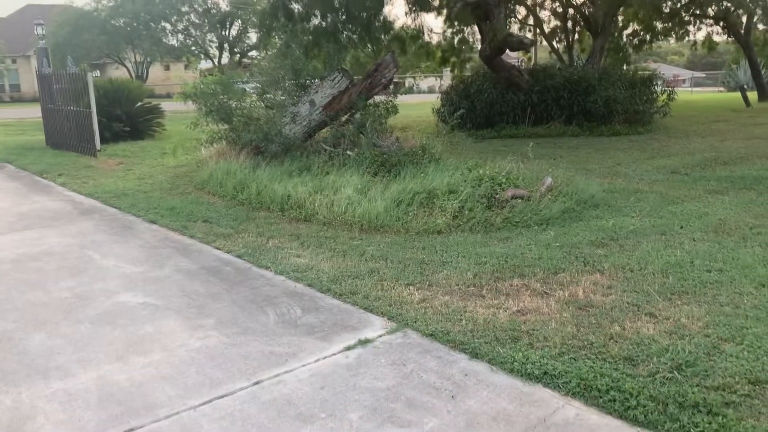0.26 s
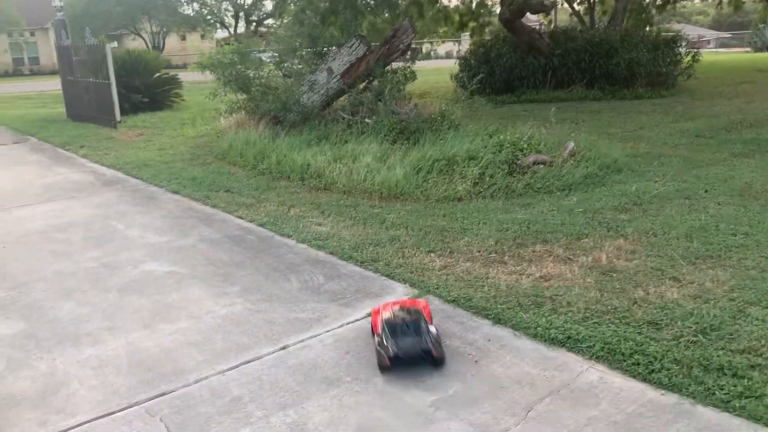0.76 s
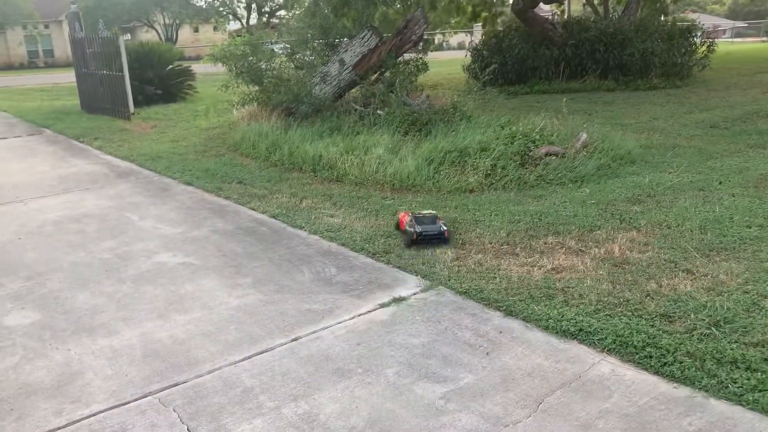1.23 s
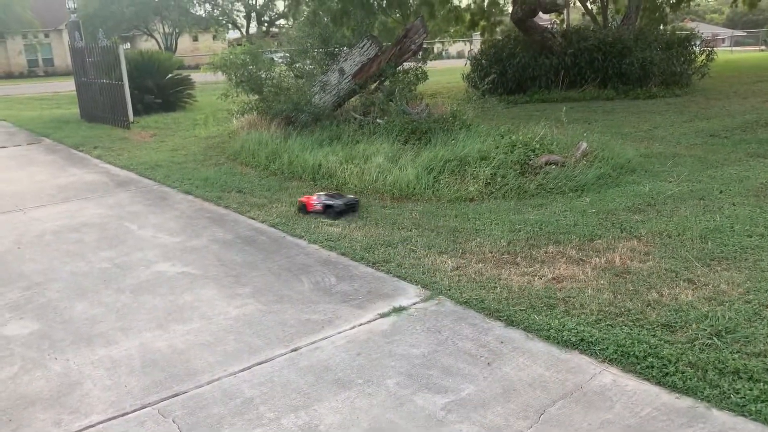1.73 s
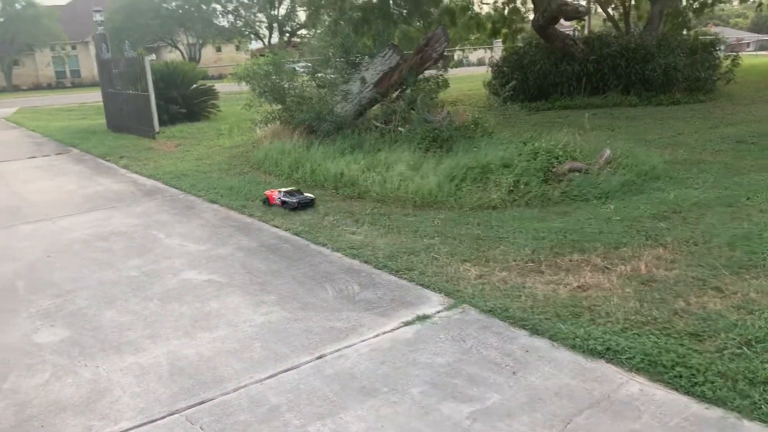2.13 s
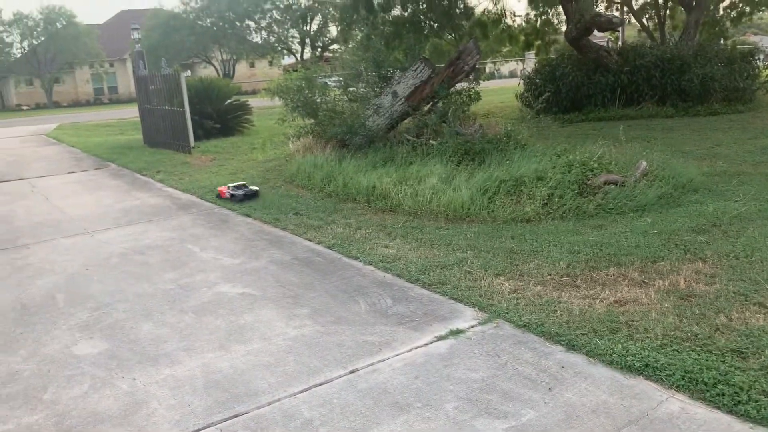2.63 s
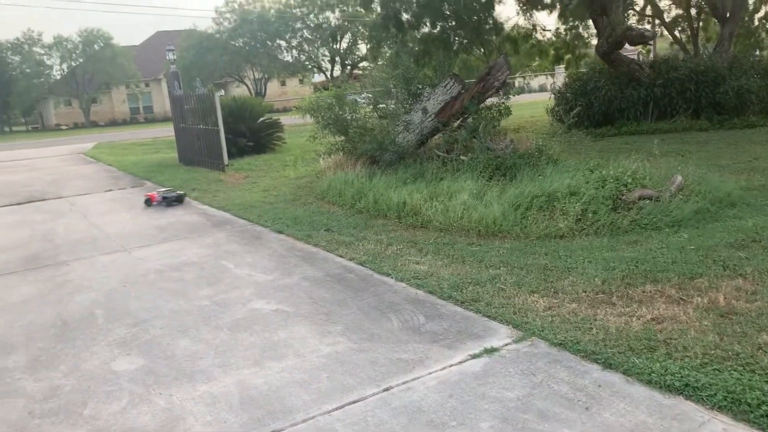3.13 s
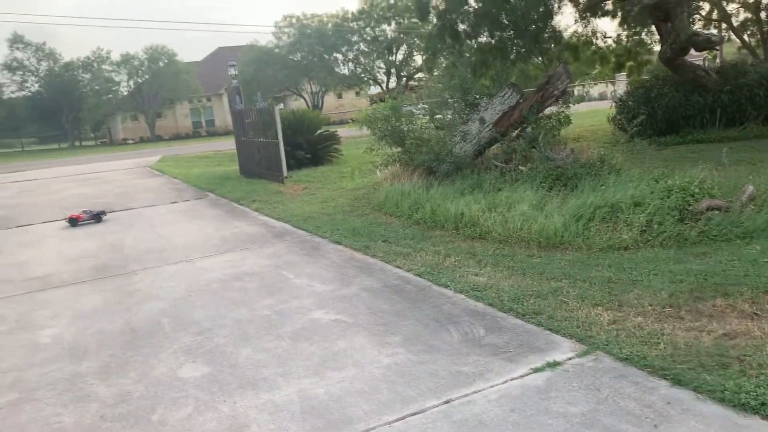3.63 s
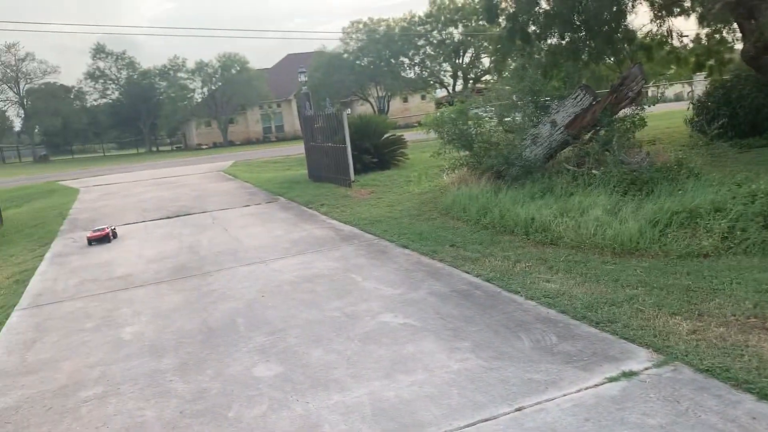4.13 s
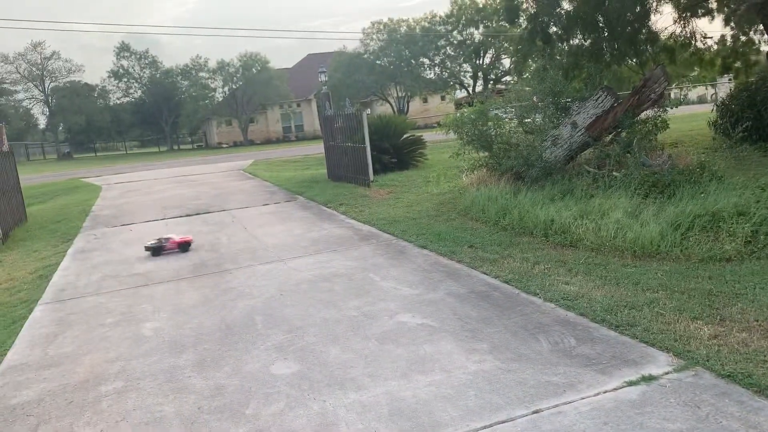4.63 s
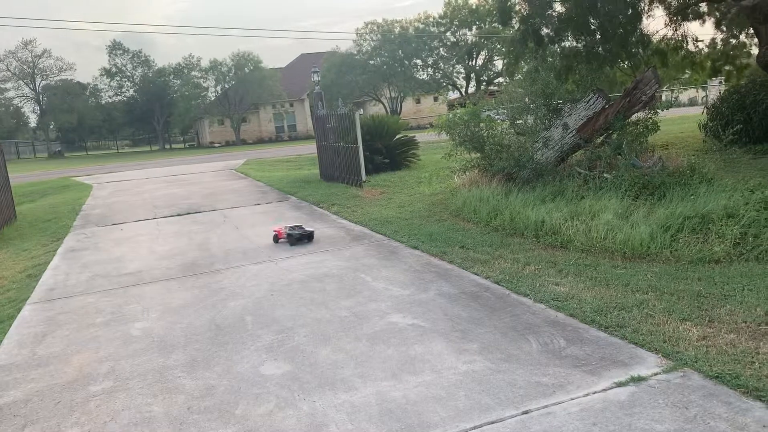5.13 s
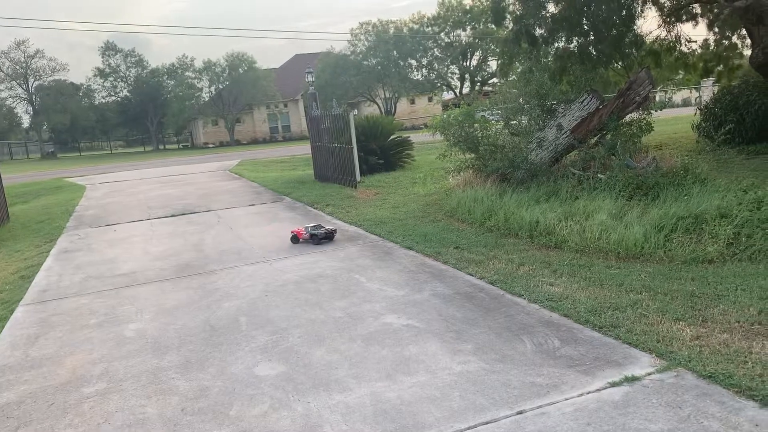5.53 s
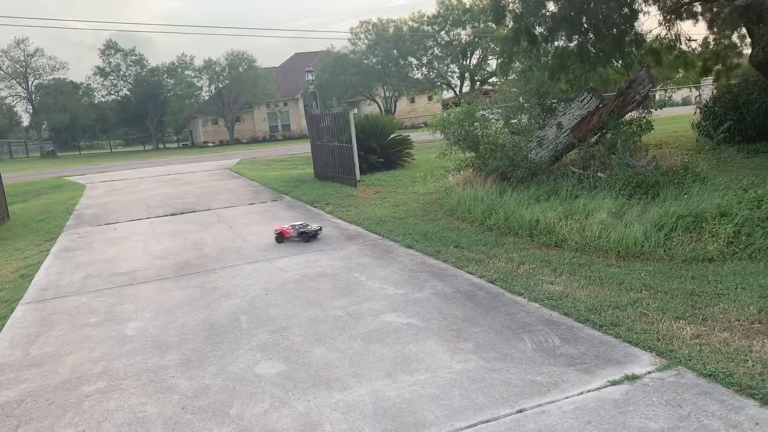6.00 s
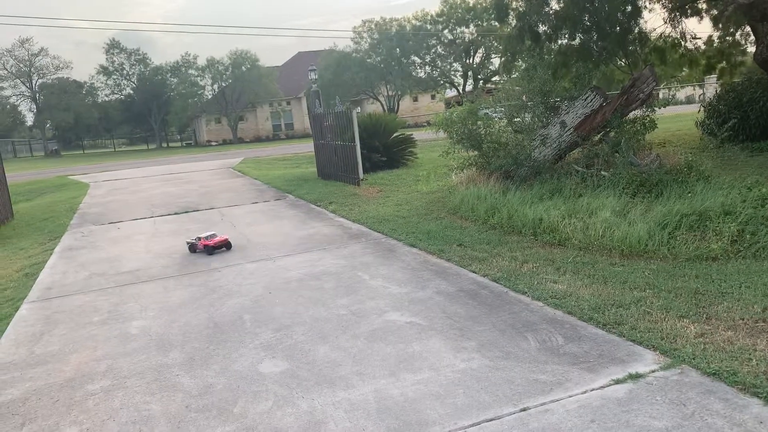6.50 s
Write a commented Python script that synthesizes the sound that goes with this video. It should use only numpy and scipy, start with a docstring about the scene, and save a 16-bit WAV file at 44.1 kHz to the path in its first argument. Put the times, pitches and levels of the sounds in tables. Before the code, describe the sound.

Outdoors, over light wind rumble and a faint, very high pulsing insect chorus, a small radio-controlled truck revs a few metres away. In the first half second its gears whine, tyres skid and chirp, and the body drums and thuds. It passes about a metre away at 0.5-0.8 s, loudest and closest, with a faint high motor tone. From 1 to 2.8 s it crosses grass: tyre howl drops, loose plastic rattles, bumps thud and the teeth chatter. Around 3 s it returns to concrete about seven metres off, with a strong hollow skid, squeals and gear clashes near 3.4 and 3.9 s. A long rev climbs from 4.2 s, then brakes at 5 s with overlapping squeals. A near lull follows until 5.8 s, when another high rev and slide begin, ending with braking and short squeals after 6.5 s.

```python
"""A house driveway and lawn, two microphones: a small radio-controlled truck darts off the concrete,
loops over the grass and comes back in bursts of throttle, about 1 to 7 m away.
Its gears whine, summed from mesh harmonics that flutter once per turn of the spur gear; the knobbly tyres
howl by replaying their tread and squeal as gliding tones; grit and loose parts are dense clicks; bumps thud.
Behind it insects pulse in the trees as gated noise, and light wind buffets the microphones as low noise."""
import sys
import numpy as np
from scipy import signal
from scipy.fft import rfft, irfft, next_fast_len
from scipy.io import wavfile
from scipy.ndimage import uniform_filter1d, map_coordinates

SR = 44100
rng = np.random.default_rng(int(sys.argv[2]) if len(sys.argv) > 2 else 0)


def materialize(psi):
    """Save the field psi as 16-bit PCM at rate SR to the path in sys.argv[1].

    A 1-D psi becomes a single channel; in a 2-D psi each row is a channel.
    """
    bounded = np.clip(np.atleast_2d(psi).T, -1, 1)
    quanta = np.round(bounded * 32767).astype(np.int16)
    wavfile.write(sys.argv[1], SR, quanta)


N = 298116
TIME = np.arange(N) / SR
CUTOFF_HZ = 16000   # top of the recorded band
# tooth-mesh rates: on arrival, at a crawl, all but stopped, and the speed at which rolling levels are stated
ENTRY_HZ, CRAWL_HZ, STALL_HZ, CRUISE_HZ = 4225, 1605, 704, 4000


def from_db(db):
    """Decibels to gain."""
    return 10 ** (np.asarray(db) / 20)


def rms_one(x):
    """Scale to unit power."""
    return x / np.sqrt(np.mean(x ** 2) + 1e-20)


def in_time(rows):
    """Each column of a table as a curve over all samples; the first column is time."""
    s, *columns = np.transpose(rows)
    return [np.interp(TIME, s, c) for c in columns]


def colour(x, spectrum):
    """Give a signal a spectrum that falls away beyond its end points; unit power."""
    hz, db = np.transpose(spectrum)
    size = next_fast_len(N)
    f = np.maximum(np.arange(size // 2 + 1) * SR / size, 1)
    edges = np.minimum(1, np.minimum(f / hz[0], hz[-1] / f)) ** 2
    gain = from_db(np.interp(np.log(f), np.log(hz), db)) * edges
    return rms_one(irfft(rfft(x, size) * gain, size)[..., :N])


def drift(rate):
    """Smooth random curve of spread 1 that changes about rate times a second."""
    size = next_fast_len(N)
    f = np.arange(size // 2 + 1) * SR / size
    smooth = rfft(rng.standard_normal(size)) / (1 + (f / rate) ** 4)
    return rms_one(irfft(smooth, size)[:N])


def grains(per_s, spread_db):
    """Random clicks of uneven size and either sign; unit power."""
    unevenness = np.minimum(rng.exponential(1, N), 4)
    sizes = from_db(spread_db * unevenness) * rng.choice([-1, 1], N)
    return rms_one(sizes * (rng.random(N) < per_s / SR))


# wind at the microphones over time: time_s, level_db
WIND_LEVEL = [(0, -35.5), (.3, -36.5), (.7, -30.5), (1.05, -37), (1.2, -32.5), (1.7, -35), (2.35, -36.5),
              (2.55, -42), (2.8, -36.5), (3.4, -36.5), (4.0, -36.5), (4.8, -37.5), (5.1, -31.5),
              (5.4, -38.5), (6.76, -37)]
# spectrum of the buffeting: frequency_hz, level_db
WIND_SPECTRUM = [(20, -4.5), (40, 1.5), (70, -1.5), (120, -7), (200, -13.5), (320, -21.5), (600, -89)]


def wind(lumpy_db=2.5, apart=0.31):
    """Lumpy low buffeting at the microphones, partly different on each side."""
    level_db, = in_time(WIND_LEVEL)
    common, own = colour(rng.standard_normal((2, N)), WIND_SPECTRUM)
    both_sides = common + apart * own * np.array([[1], [-1]])
    return from_db(level_db) * rms_one(from_db(lumpy_db * drift(4.0))) * both_sides


# spectrum of the far background: frequency_hz, level_db
AIR_SPECTRUM = [(100, -4), (350, -6), (600, -7), (1200, -8.5), (2600, -0.5), (4000, -24), (6000, -23),
                (9000, -30.5)]


def far_air(level_db=-50):
    """Steady soft noise with a broad spectrum, behind everything else."""
    return from_db(level_db) * colour(rng.standard_normal(N), AIR_SPECTRUM)


# insect chorus in the trees over time: time_s, level_db
INSECT_LEVEL = [(0, -39.5), (0.5, -44), (1.2, -41.5), (1.8, -44), (3.3, -41.5), (4.15, -46), (4.6, -41),
                (5.5, -42.5), (6.35, -34), (6.76, -39)]
# spectrum of the song: frequency_hz, level_db
INSECT_SPECTRUM = [(8000, -45), (10500, -46), (12300, -3.5), (13500, -9.5), (14700, 7), (16000, -3.5)]


def insects(pulse_hz=29, pulse_db=2.0, tooth_hz=235, rasp_db=1.0):
    """Wing strokes pulse a shrill band; the file's teeth rasp inside each stroke."""
    level_db, = in_time(INSECT_LEVEL)
    stroke = np.sin(2 * np.pi * np.cumsum(pulse_hz * (1 + 0.178 * drift(1.47))) / SR)
    teeth = np.sin(2 * np.pi * np.cumsum(tooth_hz * (1 + 0.05 * drift(28.8))) / SR)
    song = colour(rng.standard_normal(N), INSECT_SPECTRUM) * from_db(pulse_db * stroke + rasp_db * teeth)
    return from_db(level_db) * rms_one(song)


def place(x, left_lead_ms):
    """A sound from one side reaches the two microphones at different times."""
    shift = left_lead_ms / 1000 * SR / 2   # samples, half on each side
    return np.array([map_coordinates(x, [np.arange(N) + side * shift], order=3, mode="nearest")
                     for side in (1, -1)])


def garden(x, t60=0.22, wet_db=-18):
    """Walls and trees scatter a faint tail of the higher sounds, different on each side."""
    t = TIME[:SR // 2]
    tail = rng.standard_normal((2, len(t))) * from_db(-60 * t / t60) * (t > .012)
    band = signal.butter(2, [1500, 9000], "band", fs=SR, output="sos")
    tail = signal.sosfilt(band, tail)
    tail /= np.sqrt(np.sum(tail ** 2, axis=1, keepdims=True))
    return from_db(wet_db) * signal.fftconvolve(x[None], tail, axes=1)[:, :N]


# the truck lands on bumps, as heard at the microphones, before the mode levels below:
# time_s, level_db, hardness_db_per_octave
BUMPS = [(0.095, -27, -8), (0.354, -21, -2), (0.937, -23, -10), (1.159, -24, -8), (1.219, -39, -1),
         (1.311, -29.5, 6.5), (1.705, -30.5, -1), (1.848, -32, 8), (1.899, -34.5, 6.5), (2.29, -26, -13),
         (3.98, -22, -5), (4.16, -25.5, 2), (4.371, -24, -4), (4.425, -24, -5)]
# modes that a landing rings: frequency_hz, level_db, t60_s
THUD_MODES = [(66, 0.5, 0.047), (107.6, 3.5, 0.069), (180, 0.5, 0.056), (245, -3, 0.039), (340, -8, 0.022),
              (496, -19, 0.014)]


def bumps():
    """A landing thuds in the soft suspension and body shell; a harder one reaches the higher modes."""
    out, t = np.zeros(N + SR), TIME[:SR // 4]
    reference_hz = THUD_MODES[1][0]
    for s, db, hardness_db in BUMPS:
        landing = out[round(s * SR):][:len(t)]
        for k, (hz, mode_db, t60) in enumerate(THUD_MODES):
            tilt_db = hardness_db * np.log2(hz / reference_hz)
            gain = (-1) ** k * from_db(db + mode_db + tilt_db - 60 * t / t60)
            landing += gain * np.sin(2 * np.pi * hz * t)
    return out[:N]


# part throttle, as heard at the microphones: start_s, length_s, level_db
SWITCHING = [(0.465, 0.642, -56), (5.758, 0.088, -60)]


def controller(switch_hz=8030, fade_s=0.019):
    """At part throttle the speed controller's switching makes the motor sing."""
    gain = 0
    for s, length, db in SWITCHING:
        fade = np.minimum(TIME - s, s + length - TIME) / fade_s
        gain = gain + from_db(db) * np.clip(fade, 0, 1)
    return gain * np.sin(2 * np.pi * switch_hz * TIME)


# a tyre squeals, as heard at the microphones: start_s, length_s, first_pitch_hz, last_pitch_hz, level_db
SQUEALS = [(0.135, 0.03, 796, 727, -21.5), (0.214, .18, 652, 673, -28.5), (0.706, 0.15, 774, 728, -25.5),
           (3.14, 0.059, 857, 881, -28.5), (3.224, 0.057, 613.6, 645, -26.5), (3.227, .11, 849, 914, -27.5),
           (3.554, 0.1, 666, 797, -29), (4.72, .12, 860, 741.6, -30.5), (4.851, 0.1, 655.8, 727, -26.5),
           (4.963, 0.073, 660.3, 617, -19), (5.041, 0.0964, 691.3, 617, -23), (5.089, .17, 595, 761, -27.5),
           (5.137, 0.15, 593, 489, -35.5), (5.955, 0.16, 833.5, 768, -29), (6.295, 0.23, 718, 791.4, -30),
           (6.521, 0.083, 773, 807.4, -25), (6.637, 0.079, 639, 568.5, -30)]


def squeals(jitter=0.017, rough_db=2.0, octave_db=-16, fade_s=0.024):
    """Rubber sticks and slips at a wavering rate that glides as the load on the tyre shifts."""
    out = np.zeros(N)
    waver = 1 + jitter * drift(42.0)
    rough = rms_one(from_db(rough_db * drift(68.0)))
    for start, length, first_hz, last_hz, db in SQUEALS:
        span = (TIME > start) & (TIME < start + length)
        t = TIME[span] - start
        pitch_hz = (first_hz + (last_hz - first_hz) * t / length) * waver[span]
        phase = 2 * np.pi * np.cumsum(pitch_hz) / SR
        shape = np.clip(np.minimum(t, length - t) / fade_s, 0, 1)
        out[span] += from_db(db) * shape * (np.sin(phase) + from_db(octave_db) * np.sin(2 * phase))
    return rough * out


# ringing plastic parts of the chassis: frequency_hz, width_hz, level_db
CHASSIS_MODES = [(1543, 10, 3), (2950, 97, 13.5), (3458, 145, 9), (3760, 30, 0), (4250, 790, -11.5),
                 (8920, 150, 4.5)]


def chassis(x, direct=0.51):
    """Vibration is heard directly and through the ringing plastic parts; the power is kept."""
    out = direct * x
    for hz, width_hz, db in CHASSIS_MODES:
        r = np.exp(-np.pi * width_hz / SR)
        zeros = np.array([1, 0, -1]) * (1 - r * r) / 2
        poles = [1, -2 * r * np.cos(2 * np.pi * hz / SR), r * r]
        out = out + from_db(db) * signal.lfilter(zeros, poles, x)
    return rms_one(out) * np.std(x)


# rolling noises, each: level_db at 1 m and cruising speed, rise_db per doubling of speed, change_db on grass
HOWL_LAW = (-33.5, 5.1, -13.5)
GRIT_LAW = (-32.5, 8.4, -1.7)
RATTLE_LAW = (-31, 7.8, 1.5)
DRUM_LAW = (-40, 5.4, 0.33)
LAWN_FROM_S, LAWN_TO_S, EDGE_S = 1, 2.81, 0.11   # the stretch on grass; time to cross the edge


def rolling(mesh_hz, law):
    """Gain of a rolling noise: it grows with speed, changes on the grass and ends when the truck stops."""
    level_db, doubling_db, grass_db = law
    on_grass = np.clip(np.minimum(TIME - LAWN_FROM_S, LAWN_TO_S - TIME) / EDGE_S + .5, 0, 1)
    road_hz = uniform_filter1d(mesh_hz, size=7000)      # the truck's mass evens out the motor's blips
    moving = np.clip((road_hz - STALL_HZ) / (CRAWL_HZ - STALL_HZ), 0, 1)
    speed_db = doubling_db * np.log2(road_hz / CRUISE_HZ)
    return moving * from_db(level_db + speed_db + grass_db * on_grass)


# slides on concrete, in turns or as the wheels spin at a start:
# start_s, length_s, howl_level_db at 1 m at the start, swell_db_per_s, grit_db against the howl
SLIDES = [(0.169, 0.31, -19.5, -34, -3.5), (2.954, 0.23, -21, 17, 1), (3.212, 0.75, -13, -17, -4),
          (4.233, 0.9, -21, 7, -4.5), (5.755, 0.043, -39.5, 8, 13.5), (5.858, 0.37, -21.5, 5, 5.5),
          (6.275, 0.35, -20, 9.5, -5.5)]


def sliding(attack_s=0.049, release_s=0.084):
    """Gains of howl and grit in slides: each sets in fast, swells or fades, and dies as the tyres grip."""
    howl, grit = 0, 0
    for start, length, db, swell_db, grit_db in SLIDES:
        t = TIME - start
        shape = np.clip(t / attack_s, 0, 1) * np.exp(-np.maximum(t - length, 0) / release_s)
        gain = shape * from_db(db + swell_db * np.clip(t, 0, length))
        howl, grit = howl + gain, grit + gain * from_db(grit_db)
    return howl, grit


# stretches where the shell drums louder and the grit shifts in level:
# start_s, length_s, drum_change_db, grit_change_db
DRUMMING_STRETCHES = [(0, 0.46, 12, 0), (0.806, 0.4, 5, 2), (1.41, 0.475, 4, -1), (2.245, 0.11, 2.5, 4)]


def drumming_change():
    """Changes of drumming and grit, in dB, with softened edges."""
    change_db = np.zeros((2, N))
    for s, length, *drum_and_grit_db in DRUMMING_STRETCHES:
        change_db += np.outer(drum_and_grit_db, (TIME >= s) & (TIME < s + length))
    return uniform_filter1d(change_db, size=3000)


# spectra of grit, loose parts, differential and body shell, each: frequency_hz, level_db
GRIT_SPECTRUM = [(450, -14), (700, 15), (1150, 7.5), (1350, 6), (1550, 8.5), (1900, 1), (2400, 2),
                 (3500, -9)]
RATTLE_SPECTRUM = [(1700, 21.5), (2400, 18), (2900, 13.5), (4400, 17), (5500, 1), (7000, 14), (8200, 21),
                   (12000, -32.5)]
GNASH_SPECTRUM = [(2600, 16), (3500, 16.5), (4600, -12), (5600, -17)]
SHELL_SPECTRUM = [(130, -11), (220, -15.5), (335, 3), (400, 0), (480, -1), (650, -5.5)]


def scrubbing(grit_gain, rattle_gain, drum_gain, gnash_gain, shake_db=2.0):
    """Grit, loose parts and the differential tick densely, the shell drums; the ground shakes them together."""
    shake = rms_one(from_db(shake_db * drift(18.0)))
    drum_db, grit_db = drumming_change()
    grit = grit_gain * from_db(grit_db) * colour(grains(per_s=3000, spread_db=0.0), GRIT_SPECTRUM)
    rattle = rattle_gain * chassis(colour(grains(per_s=6200, spread_db=4.5), RATTLE_SPECTRUM))
    gnash = gnash_gain * colour(grains(per_s=2500, spread_db=3.0), GNASH_SPECTRUM)
    drum = drum_gain * from_db(drum_db) * colour(grains(per_s=660, spread_db=-0.5), SHELL_SPECTRUM)
    return shake * (grit + rattle + gnash + drum)


# resonance of the tyre: frequency_hz, level_db
TYRE_SPECTRUM = [(400, -18.5), (520, -11), (620, 8), (720, 7), (830, 5), (1000, -13.5), (1400, -60)]
MESHES_PER_TREAD_REPEAT = 60


def tyres(mesh_hz, howl_gain, lumpy_db=2.5, overtones_db=-12):
    """Each tyre replays its own uneven tread, so its lines glide with speed through the tyre's resonance."""
    repeat_hz = np.maximum(mesh_hz, 2200) / MESHES_PER_TREAD_REPEAT
    steering = .09 * drift(2.5)
    tread = 0
    for side in (1, -1):      # one wheel speeds up as the other slows
        profile = irfft(np.exp(2j * np.pi * rng.random(size=257)))
        angle = np.cumsum(repeat_hz * (1 + side * steering)) / SR
        around = np.linspace(0, 1, len(profile), endpoint=False)
        tread = tread + np.interp(angle, around, profile, period=1)
    scrub = .25 * colour(rng.standard_normal(N), TYRE_SPECTRUM)
    overtones = from_db(overtones_db) * colour(tread, GRIT_SPECTRUM)
    howl = colour(tread, TYRE_SPECTRUM) + overtones + scrub
    howl = howl / np.sqrt(uniform_filter1d(howl ** 2, size=4000) + 1e-6)   # even out the loudness
    return howl_gain * howl * rms_one(from_db(lumpy_db * drift(11.3)))


# bursts of throttle; whine levels are at 1 m, before load, clashes and the gearbox shape them:
# start_s, spin_up_s, hold_s, top_mesh_hz, coast_time_constant_s, power_level_db, coast_level_db
THROTTLE = [(0.046, 0.044, 0.0045, 4245, 0.13, -24.5, -30.5),
            (0.359, 0.033, 0.0043, 2426, 0.09, -26.5, -39), (0.414, 0.094, 0.012, 2810, 0.2, -33, -42),
            (0.564, 0.18, 0.091, 4138, 0.127, -33, -32), (0.914, 0.28, 0.021, 2204, 0.12, -31, -43),
            (1.361, 0.038, 0.0034, 3265, 0.065, -47, -59), (1.421, 0.052, 0.066, 4402, 0.087, -24.5, -41.5),
            (2.045, 0.27, 0.0064, 3080, 0.12, -34.5, -33), (2.341, 0.049, 0.055, 3362, 0.29, -28.5, -35),
            (2.434, 0.17, 0.052, 4197, 0.23, -38, 2), (2.746, 0.077, 0.0084, 4075, 0.15, -40, -11),
            (2.851, 0.152, 0.254, 5883, 0.239, -33.5, -32.5),
            (3.506, 0.042, 0.075, 2707, 0.13, -21.5, -36.5), (4.077, 0.33, 0.005, 4497, 0.24, -25.5, -29),
            (4.272, 0.25, 0.29, 7206, 0.25, -33, -41.5), (5.805, 0.16, 0.01, 5408, 0.33, -26.5, -25),
            (5.952, 0.1, 0.21, 7995, 0.33, -33.5, -22.5)]
# the brakes go on: start_s
BRAKES = [4.954, 6.533]


def drive(brake_s=.28):
    """Throttle swings the motor up; let go, it coasts to a crawl; brakes stop it. Gives mesh Hz, whine dB."""
    mesh_hz = CRAWL_HZ + (ENTRY_HZ - CRAWL_HZ) * np.exp(-TIME / THROTTLE[0][4])
    whine_db = np.full(N, float(THROTTLE[0][6]))
    for start, spin_up, hold, top_hz, coast, power_db, coast_db in THROTTLE:
        first = int(start * SR)
        t = TIME[first:] - start
        swing = (1 - np.cos(np.pi * np.clip(t / spin_up, 0, 1))) / 2
        momentum = np.exp(-np.maximum(t - spin_up - hold, 0) / coast)
        driven_hz = mesh_hz[first] * (top_hz / mesh_hz[first]) ** swing
        mesh_hz[first:] = CRAWL_HZ + (driven_hz - CRAWL_HZ) * momentum
        whine_db[first:] = coast_db + (power_db - coast_db) * momentum
        for s in BRAKES:
            if s > start:
                mesh_hz = np.maximum(mesh_hz * np.clip(1 - (TIME - s) / brake_s, 0, 1), STALL_HZ)
    return mesh_hz, uniform_filter1d(whine_db, size=2000)


# the teeth clash as the load on them reverses: start_s, length_s, extra_whine_db
CLASHES = [(0.976, 0.0072, -3), (1.196, 0.025, 14), (1.24, 0.023, 19.5), (1.284, 0.014, 10),
           (1.323, 0.017, 18), (1.596, 0.02, 8.5), (3.414, 0.0194, 18.5), (3.447, 0.021, 19),
           (3.473, 0.023, 22.5), (3.841, 0.02684, 10), (3.891, 0.0339, 16), (3.942, 0.031, 16.5),
           (3.994, 0.028, 18), (4.062, 0.027, 16)]


def clashes(sag_hz=128):
    """The mesh rate is kicked up and drops through a clash: its depth (0-1), extra dB and swing in Hz."""
    inside, extra_db, swing_hz = 0, 0, 0
    for start, length, db in CLASHES:
        progress = np.clip((TIME - start) / length, 0, 1)
        shape = np.sqrt(4 * progress * (1 - progress))
        inside, extra_db = inside + shape, extra_db + db * shape
        swing_hz = swing_hz + sag_hz * 2 * shape * (1 - 2 * progress)
    return np.minimum(inside, 1), extra_db, swing_hz


# how the gearbox radiates: frequency_hz, level_db
GEARBOX = [(1500, 2), (2200, -4.5), (2700, 9.5), (3400, 7), (4400, 7), (5300, -0.5), (7000, -1.5),
           (8300, 12), (9200, 12), (10500, -3), (12400, 21.5), (15000, -9)]
SPUR_TEETH = 90


def gears(mesh_hz, whine_db, jitter=0.009, rough_db=4.5, overtone_db=-1, loose_db=-4, tight_db=-0.86,
          fast_db=-5, clash_ring_hz=3600, load_db=2.5):
    """The spur gear runs out of true: once a turn the mesh speeds up, then bites and slows; slack teeth chatter."""
    turn_hz = mesh_hz / SPUR_TEETH * (1 + .5 * drift(20))
    turn = 2 * np.pi * np.cumsum(turn_hz) / SR
    speeding = uniform_filter1d(np.gradient(np.log(mesh_hz)) * SR, size=3000)
    pull = np.clip(speeding / 2, 0, 1)      # under throttle the teeth stay pressed together
    clashing, clash_db, clash_hz = clashes()
    slack = np.clip(2800 / mesh_hz, .7, 1.1) * (1 - .4 * pull) * (1 - clashing)
    flutter = .036 * slack * (1 + .7 * drift(15))
    wander = slack * (.022 * drift(14) + .022 * drift(90))
    hz = (mesh_hz + clash_hz) * (1 + wander + flutter * np.cos(turn) + jitter * drift(375.0))
    phase = 2 * np.pi * np.cumsum(hz) / SR
    bite_db = 5 * slack * np.sin(turn - .9)
    box_hz, box_db = np.transpose(GEARBOX)
    # a fast, hard-driven mesh is purer
    octaves_above_crawl = np.log2(np.maximum(mesh_hz / CRAWL_HZ, 1))
    step_db = loose_db + tight_db * np.clip(speeding, 0, 20) + fast_db * octaves_above_crawl
    whine = 0
    for k in range(1, 4):      # whichever harmonic meets the gearbox's resonance leads
        fall_db = overtone_db * (k - 1) ** 3 + (k - 1) * step_db
        # a clash changes only what lies near its resonance
        ringing = np.exp(-(2 * np.log2(k * hz / clash_ring_hz)) ** 2)
        radiated_db = np.interp(k * hz, box_hz, box_db)
        gain = from_db(radiated_db + fall_db + clash_db * ringing) * (k * hz < CUTOFF_HZ)
        unsteady = from_db(bite_db - 2 * slack + rough_db * drift(113))
        whine = whine + gain * unsteady * np.sin(k * phase)
    turning = np.clip((mesh_hz - STALL_HZ) / (CRAWL_HZ - STALL_HZ), 0, 1) ** 2
    return chassis(turning * from_db(whine_db + load_db * pull) * whine, direct=3.8)


# the truck's path past the microphones: time_s, distance_m, left_lead_ms
PATH = [(0, 3.96, -0.21), (.45, 1, -0.082), (.8, 0.97, -0.011), (1.1, 2.31, 0.04), (2.1, 4.73, 0.11),
        (3.2, 6.92, 0.15), (4, 6.75, 0.17), (5, 4.58, 0.13), (6.76, 6.19, 0.12)]


def scene(gnash_db=-12.5, far_lead_ms=0.1504):
    """Motor speed, ground and distance set the running noises; insects and far air share one direction."""
    mesh_hz, whine_db = drive()
    distance_m, left_lead_ms = in_time(PATH)
    slide, slide_grit = sliding()
    howl = tyres(mesh_hz, np.hypot(rolling(mesh_hz, HOWL_LAW), slide))
    grit_gain = np.hypot(rolling(mesh_hz, GRIT_LAW), slide_grit)
    rattle_gain, drum_gain = rolling(mesh_hz, RATTLE_LAW), rolling(mesh_hz, DRUM_LAW)
    ticking = scrubbing(grit_gain, rattle_gain, drum_gain, slide * from_db(gnash_db))
    running = (gears(mesh_hz, whine_db) + howl + ticking) / distance_m
    truck = running + controller() + squeals() + bumps()
    far = insects() + far_air()
    return place(truck, left_lead_ms) + garden(truck) + place(far, far_lead_ms) + wind()


def record(dry, port_hz=5160, port_q=3.2):
    """The right microphone port turns the phase around its resonance; the top is cut steeply."""
    _, poles = signal.iirpeak(port_hz, port_q, fs=SR)
    right = signal.lfilter(poles[::-1], poles, dry[1])   # all-pass
    top_cut = signal.ellip(12, .1, 90, CUTOFF_HZ, fs=SR, output="sos")
    return signal.sosfilt(top_cut, np.array([dry[0], right]))


dry = scene()
out = record(dry)
materialize(out)
```